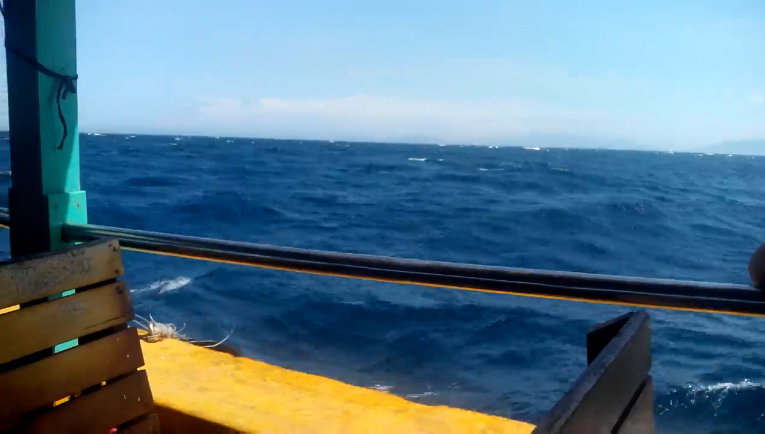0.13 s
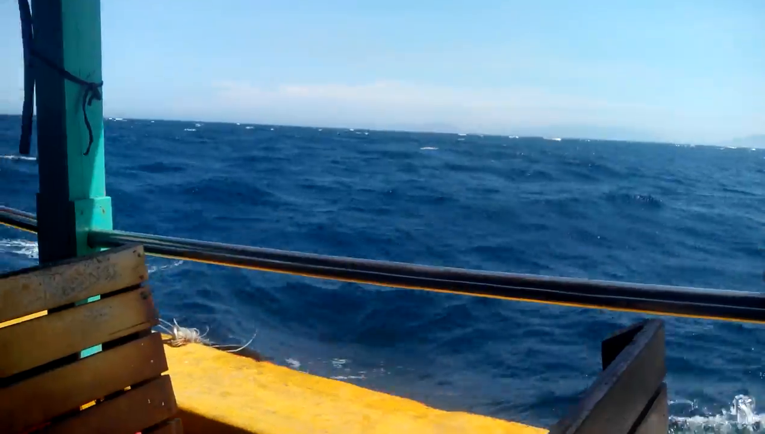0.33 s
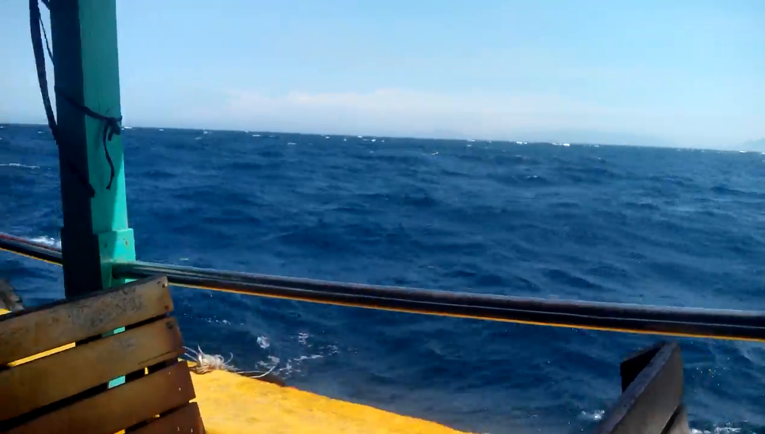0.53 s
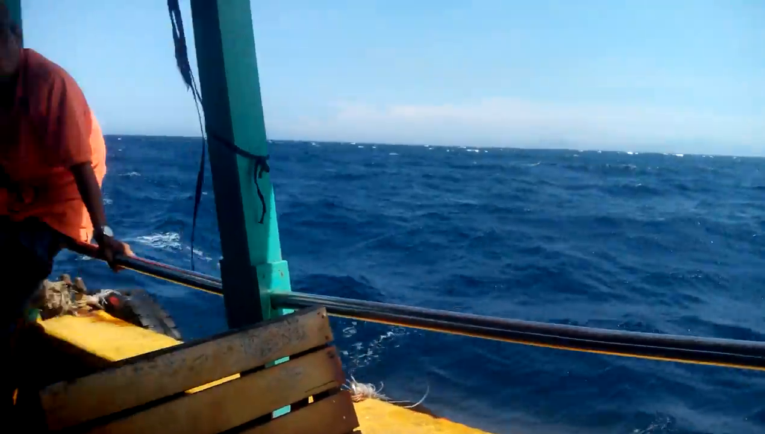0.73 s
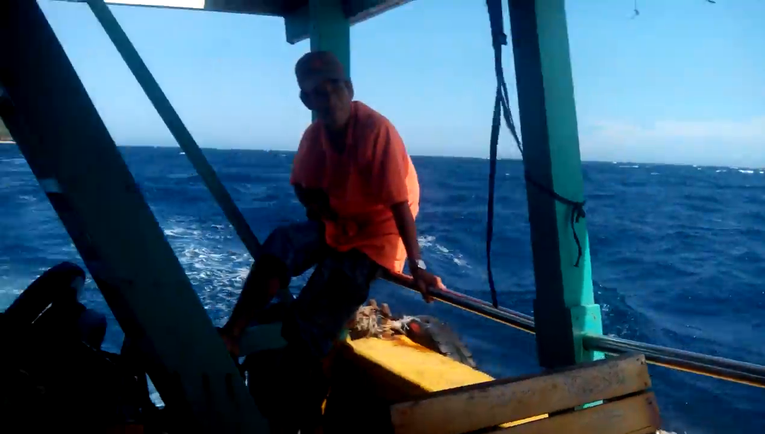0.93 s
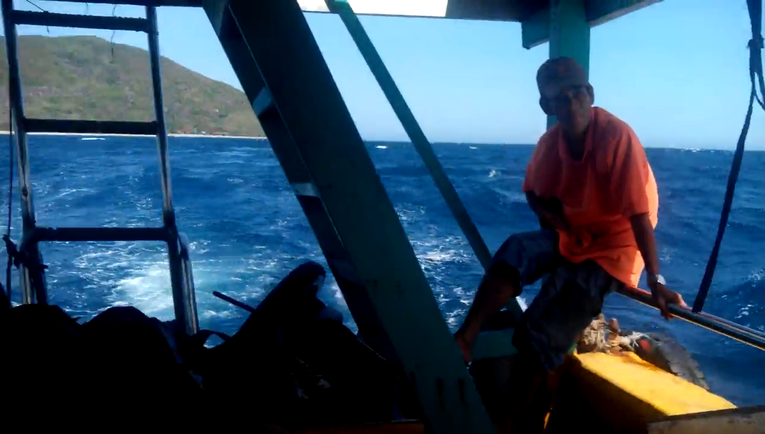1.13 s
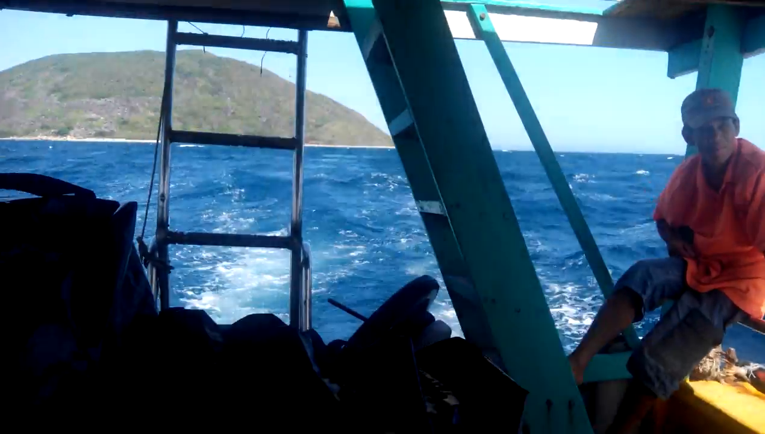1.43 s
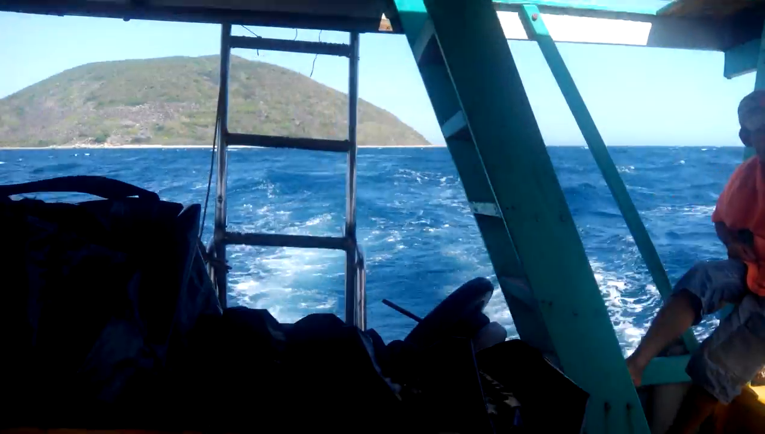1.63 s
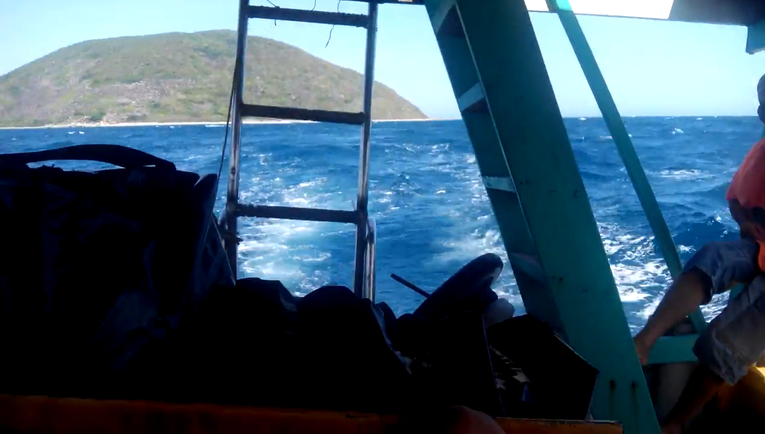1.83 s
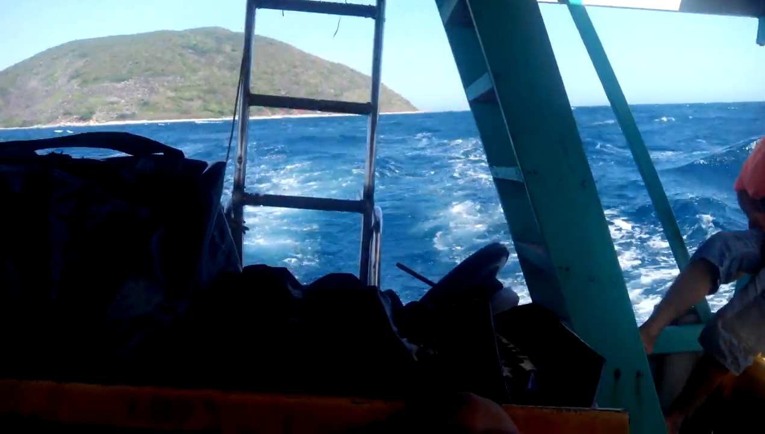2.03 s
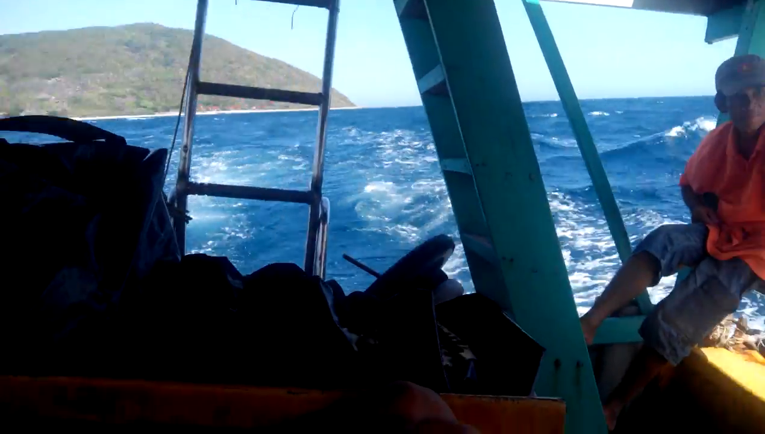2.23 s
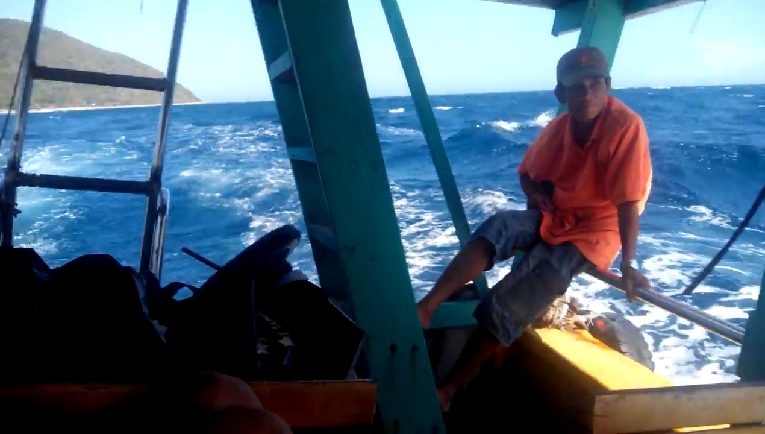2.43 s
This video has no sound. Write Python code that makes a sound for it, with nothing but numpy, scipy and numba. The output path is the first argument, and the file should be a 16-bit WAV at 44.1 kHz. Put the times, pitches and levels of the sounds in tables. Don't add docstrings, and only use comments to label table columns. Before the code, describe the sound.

A boat's diesel engine drones and throbs steadily over low rushing wake wash and faint wind

```python
import sys
import numpy as np
from scipy import signal
from scipy.fft import rfft, irfft
from scipy.io import wavfile
from scipy.ndimage import uniform_filter1d
from numba import njit

SR = 44100
rng = np.random.default_rng(int(sys.argv[2]) if len(sys.argv) > 2 else 0)


def boost(x):
    u = np.asarray(x, float) / 20
    return 10 ** u


def master_out(mix):
    frames = np.transpose(np.atleast_2d(mix))
    ceiling = np.clip(frames, -1, 1)
    pcm = np.round(ceiling * 32767).astype(np.int16)
    wavfile.write(sys.argv[1], SR, pcm)


N = 113778

# start_s, length_s, from_hz, to_hz, level_db
WHISTLES = [
    (.52, .07, 1050, 1020, -29),
    (.92, .1, 990, 960, -31),
    (1.9, .16, 960, 945, -32),
    (2.4, .26, 940, 850, -28),
]
WHISTLE_WOBBLE_HZ = 8
MOAN_HZ, MOAN_WANDER_RATIO, MOAN_WIDTH_HZ, MOAN_DB = 1030, .08, 60, -37

# start_s, level_db, pitch_hz
DROPS = [
    (.291, -45.5, 5860),
    (.416, -58, 9000),
    (2.291, -53, 4870),
]
DROP_PEAK_S = .002

# frequency_hz, level_db
WASH_COLOUR = [(26, -46), (42, -7.5), (96, -8), (225, -7.5), (290, -12.5), (358, -9), (470, -15),
               (1000, -15.5), (1350, -20.5), (1800, -51.5)]
# frequency_hz, level_db
SPRAY_COLOUR = [(900, -29), (1400, -5), (1900, -10), (3100, -24.5), (4500, -33.5), (7000, -41),
                (11000, -51.5), (16000, -51)]
# centre_hz, width_hz, lift_db
CASE_MODES = [(628, 17, 2), (1023, 57, 4.5), (2000, 89, 2.5), (2830, 440, 2.5), (4740, 500, 2.5),
              (6100, 750, 1), (10800, 1500, 4.5)]
# time_s, wash_db, spray_db, engine_db
GUSTS = [(.14, 0.5, 0.5, -0.5), (.3, 2, -.5, -0.5), (.55, 1.1, 0.5, -1), (.8, 0, 0, 0), (1, 1, .5, -1),
         (1.25, 1, 1.5, 0), (1.5, -1, .5, 2), (1.8, 0, 0, -0.5), (2.05, 0, 0, -1), (2.2, 1, -1, -2),
         (2.55, 0.2, -0.5, -0.5)]
WASH_DB, SPRAY_DB = -18.5, -37.5
SWELL_DB, FLICKER_DB, CALM_BELOW_HZ = -0.32, 1.08, 550
PUFF_DB, PUFF_LAG_CYCLES = .75, 0.45

# time_s, twice_firing_rate_hz
ENGINE_SPEED = [(.14, 92.8), (.6, 93.35), (1, 93.2), (1.4, 92.75), (1.8, 92.3), (2.2, 92.2), (2.58, 92.7)]
CRANK_START_TURNS = .45
CRANK_ORDERS = [3, 4.655, 5, 6, 7, 7.5, 9, 12, 13, 15, 16, 23]
# level_db_rms, change_over_scene_db
ORDER_LEVELS = [(-31, 4), (-28, -7), (-31, 0), (-21.5, -3), (-35, -9), (-34, 9), (-31, -6), (-29, -1),
                (-38, 9), (-28.5, -4), (-31, -1), (-35, 0)]
HUM_WANDER_DB, HUM_WANDER_HZ = .8, 5
CYLINDER_BLOW_DB = [3, -14.5, -15, 3, -7, -10.5]
# centre_hz, width_hz, level_db
HULL_MODES = [(182.2, 123, -5), (345, 49, -4.5), (605, 140, -13.5), (1055, 590, -14)]
KNOCK_DB, KNOCK_SCATTER_DB, KNOCK_LEAD_TURNS, BLOW_S = -30, 2.5, 0.0405, .0007

OPEN_S, GLITCH_S, GLITCH_DB = .1416, .1523, -33


def level(x, db):
    return x * boost(db) / np.sqrt(np.mean(x ** 2))


@njit
def svf(x, hz, width_hz):
    y, b, l = np.empty(len(x)), 0., 0.
    for i in range(len(x)):
        g, k = np.tan(np.pi * hz[i] / SR), width_hz / hz[i]
        v = (b + g * (x[i] - l)) / (1 + g * (g + k))
        b, l, y[i] = 2 * v - b, l + 2 * g * v, k * v
    return y


def resonate(x, hz, width_hz):
    centre_hz = np.zeros(N) + hz
    once = svf(x, centre_hz, 1. * width_hz)
    return svf(once, centre_hz, 1. * width_hz)


def walk(rate_hz):
    hold = int(SR / rate_hz)
    steps = np.repeat(rng.standard_normal(N // hold + 1), hold)
    return uniform_filter1d(uniform_filter1d(steps, hold), hold)[:N]


def curve(table, column):
    rows = np.array(table)
    return np.interp(np.arange(N) / SR, rows[:, 0], rows[:, column])


def rigging():
    t = np.arange(N) / SR
    moan_hz = MOAN_HZ * (1 + MOAN_WANDER_RATIO * walk(11))
    moan = resonate(rng.standard_normal(N), moan_hz, MOAN_WIDTH_HZ)
    out = level(moan * boost(5.7 * walk(14)), MOAN_DB)
    for start_s, length_s, from_hz, to_hz, db in WHISTLES:
        part = np.clip((t - start_s) / length_s, 0, 1)
        hz = from_hz + (to_hz - from_hz) * np.sqrt(part) + WHISTLE_WOBBLE_HZ * walk(40)
        tone = np.sin(2 * np.pi * np.cumsum(hz) / SR)
        swell = np.sqrt(2 * np.sin(np.pi * part) + 1e-12)
        out = out + boost(db + 1.5 * walk(25)) * tone * swell
    return out


def drops():
    out, t = 0, np.arange(N) / SR
    for start_s, db, hz in DROPS:
        age = np.clip(t - start_s, 0, 1) / DROP_PEAK_S
        burst = rng.standard_normal(N) * np.exp(1 - age) * age
        out = out + boost(db) * 2 * resonate(burst, hz, 0.59 * hz)
    return out


def patchy_noise(colour, level_db, pulse_db, count):
    rows, hz = np.array(colour), np.fft.rfftfreq(N, 1 / SR) + 1e-3
    log_hz, log_rows = np.log(hz), np.log(rows[:, 0])
    colour_db = np.interp(log_hz, log_rows, rows[:, 1], left=-90, right=-90)
    case_db = sum(db / (1 + (2 * (hz - top) / width) ** 2) for top, width, db in CASE_MODES)
    spectrum = rfft(rng.standard_normal(N)) * boost(colour_db + case_db)
    centres = np.linspace(log_rows[0], log_rows[-1], count)
    spacing = centres[1] - centres[0]
    out, swell = 0, walk(1.7)
    for centre in centres:
        share = np.clip(1 - abs(log_hz - centre) / spacing, 0, 1)
        calm = min(np.exp(centre) / CALM_BELOW_HZ, 1)
        gain_db = (SWELL_DB * swell + FLICKER_DB * walk(14)) * calm + pulse_db
        out = out + irfft(spectrum * share, N) * boost(gain_db)
    return level(out, level_db)


def sea(turns):
    firing_cycles = turns * len(CYLINDER_BLOW_DB) / 2
    puff_db = PUFF_DB * np.cos(2 * np.pi * (firing_cycles - PUFF_LAG_CYCLES))
    wash = patchy_noise(WASH_COLOUR, WASH_DB, puff_db + curve(GUSTS, column=1), count=16)
    spray = patchy_noise(SPRAY_COLOUR, SPRAY_DB, puff_db + curve(GUSTS, column=2), count=10)
    return wash + spray


def crank_hum(turns):
    progress = np.arange(N) / N - .5
    out = 0
    for order, (db, change_db) in zip(CRANK_ORDERS, ORDER_LEVELS):
        gain = np.sqrt(2) * boost(db + change_db * progress + HUM_WANDER_DB * walk(HUM_WANDER_HZ))
        out = out - gain * np.cos(2 * np.pi * order * turns)
    return out


def firing_knock(turns):
    firing = np.floor(3 * (turns + KNOCK_LEAD_TURNS)).astype(int)
    at = np.flatnonzero(np.diff(firing)) + 1
    scatter_db = KNOCK_SCATTER_DB * rng.standard_normal(len(at))
    blows = np.zeros(N)
    blows[at] = boost(np.array(CYLINDER_BLOW_DB)[firing[at] % 6] + scatter_db)
    blow_samples = int(BLOW_S * SR)
    blows = uniform_filter1d(uniform_filter1d(blows, blow_samples), blow_samples)
    ringing = 0
    for k, (hz, width_hz, db) in enumerate(HULL_MODES):
        sign = (-1) ** (k + 1)
        ringing = ringing + sign * boost(db) * resonate(blows, hz, width_hz)
    return level(ringing, KNOCK_DB)


def engine(turns):
    return (crank_hum(turns) + firing_knock(turns)) * boost(curve(GUSTS, column=3))


def scene():
    turns = np.cumsum(curve(ENGINE_SPEED, column=1)) / 6 / SR + CRANK_START_TURNS
    return (rigging() + drops() + sea(turns) + engine(turns))[None]


def band_limit(x):
    return signal.sosfilt(signal.butter(12, 15720, fs=SR, output="sos"), x)


def record(dry):
    t = np.arange(N) / SR
    since_open_s = t - OPEN_S
    opened = np.clip(since_open_s / .0003, 0, 1) * np.clip(.5 + since_open_s / .03, 0, 1)
    jumps = sum(np.exp(-np.clip(t - s, 0, 1) / .0004) * (t >= s) for s in (OPEN_S, GLITCH_S))
    return band_limit(dry * opened - boost(GLITCH_DB) * jumps)


dry = scene()
out = record(dry)
master_out(out)
```